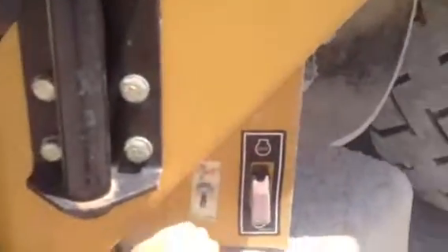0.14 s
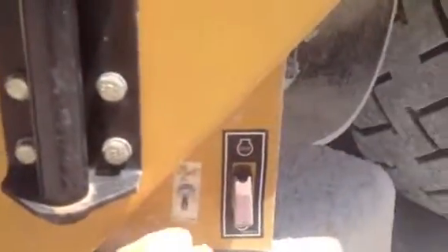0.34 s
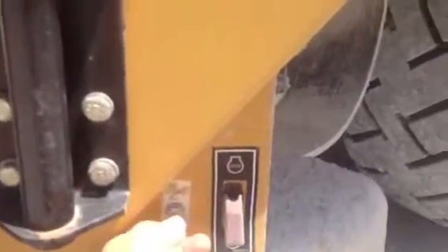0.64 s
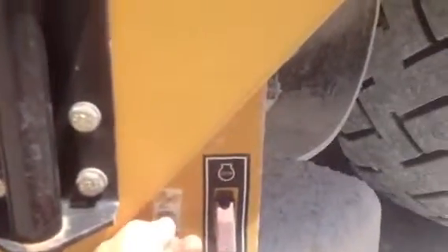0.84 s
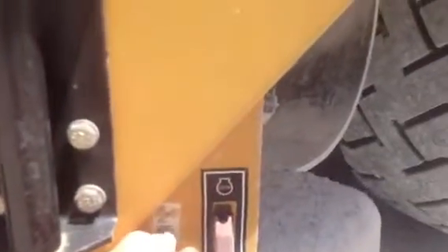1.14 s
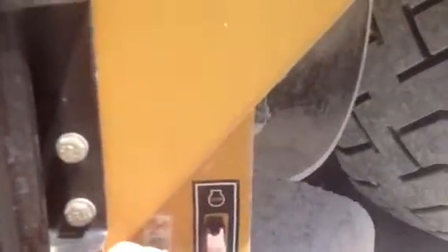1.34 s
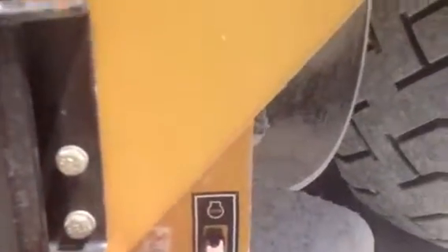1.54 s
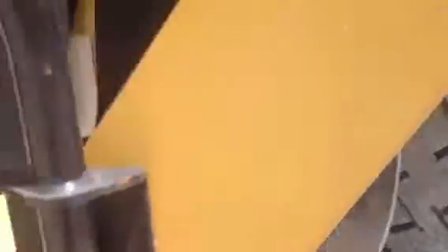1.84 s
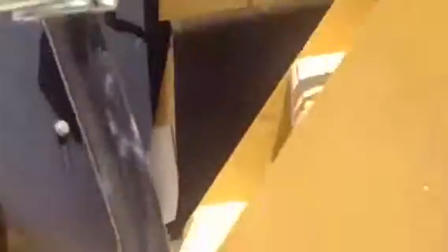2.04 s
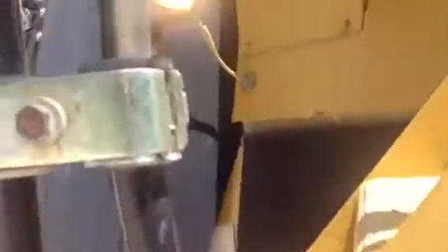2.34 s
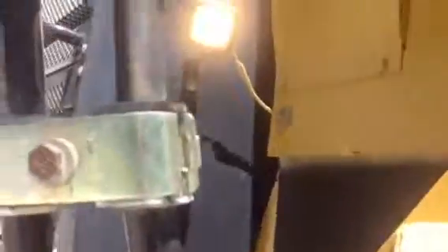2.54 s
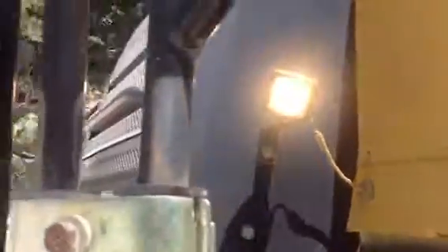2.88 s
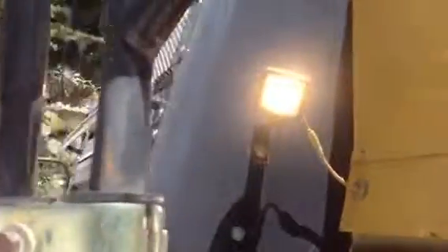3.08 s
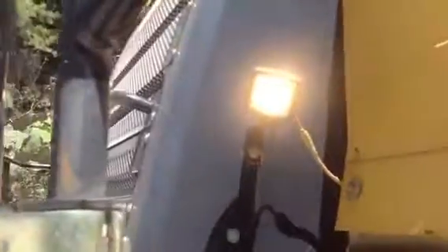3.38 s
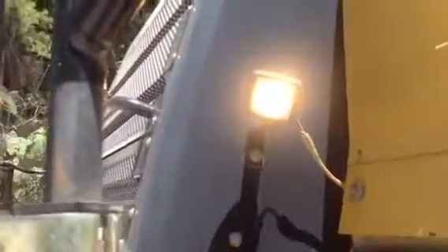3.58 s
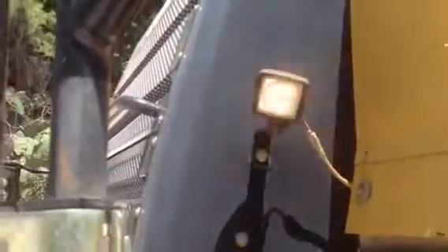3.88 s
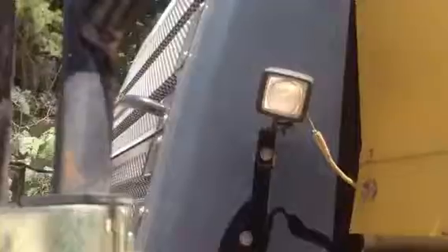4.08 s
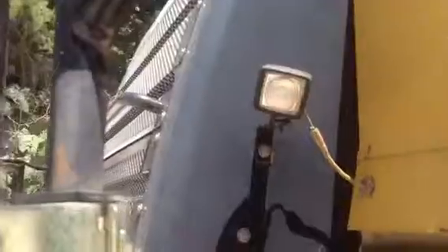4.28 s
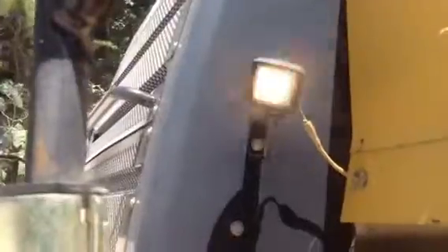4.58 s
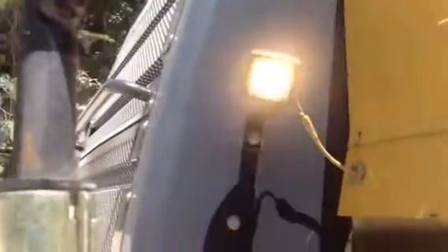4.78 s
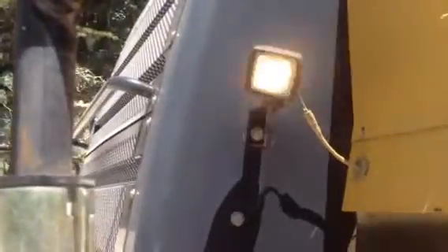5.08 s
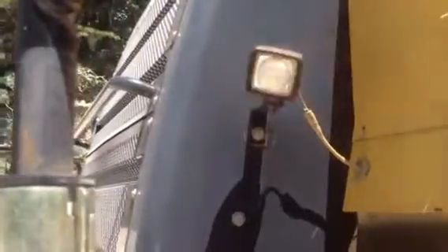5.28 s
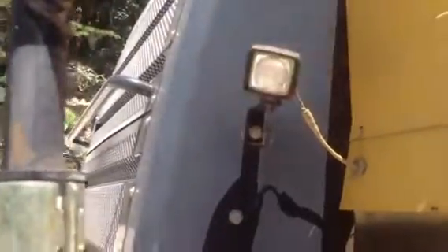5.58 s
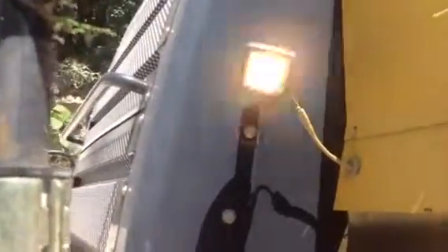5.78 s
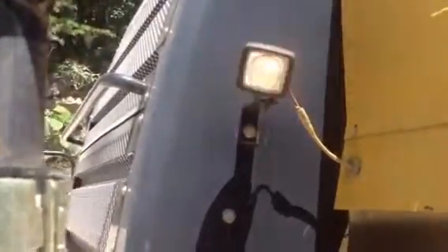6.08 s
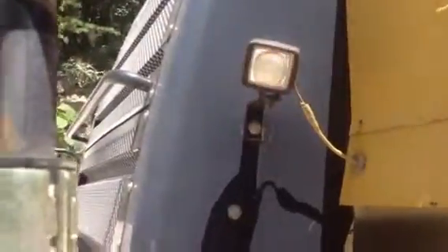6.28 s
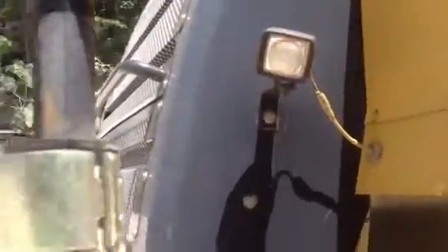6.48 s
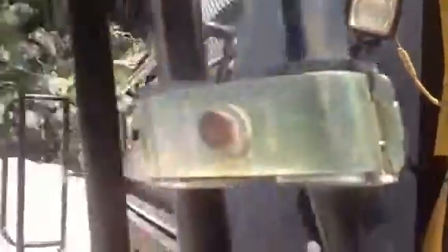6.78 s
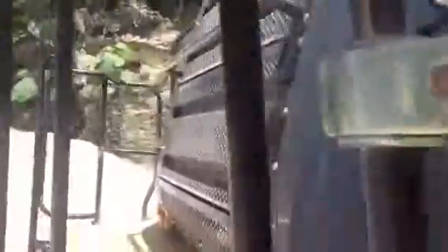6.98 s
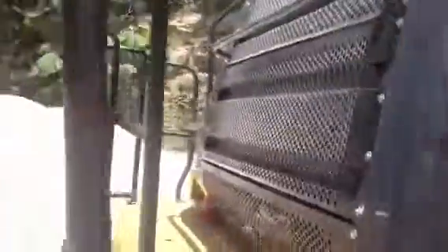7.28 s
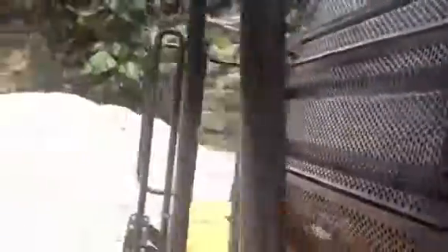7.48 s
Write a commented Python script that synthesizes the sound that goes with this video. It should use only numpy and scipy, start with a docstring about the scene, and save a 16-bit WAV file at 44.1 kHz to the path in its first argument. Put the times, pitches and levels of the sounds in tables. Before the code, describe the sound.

Outdoors on a parked, silent heavy truck, a cicada throbs rapidly from the trees. A switch snaps once against a steel panel with a short ring. The cicada swells, soft shoe scuffs and low thuds follow, then a relay clacks five times, irregularly spaced, sharp and tinny. The cicada dies away midway, leaving a faint forest hush. Grit ticks and a low footfall end it. Close handheld mono microphone, slight air buffeting.

```python
"""Relay clacks and a cicada on a steel deck

On the steel deck of a parked quarry truck, engine off, a switch snaps once and a relay then clacks five times
as a work lamp goes off and on: short cracks excite decaying modes of the sheet steel. A cicada in the trees
throbs, swells and dies away, its paired strokes being shaped noise. Slipping shoes scuff, damped low notes
thud, and bursts of filtered noise give grit ticks and rubbing. Uneven low noise is air buffeting the
hand-held mono microphone, over a steady forest hush."""
import sys
import numpy as np
from scipy import signal
from scipy.fft import rfft, irfft
from scipy.io import wavfile
from scipy.ndimage import uniform_filter1d, map_coordinates

SR = 44100
rng = np.random.default_rng(int(sys.argv[2]) if len(sys.argv) > 2 else 0)


def store_pcm(level_fs):
    """Save levels as 16-bit WAV."""
    pcm = np.round(np.clip(level_fs, -1, 1) * 32767).astype(np.int16)
    wavfile.write(sys.argv[1], SR, np.atleast_2d(pcm).T)


N = 336483
T = np.arange(N) / SR  # time, s

# switch snap, and relay clacks: start_s, level_db, extra_crack_db, body_db, clang_db, treble_db
SWITCH_SNAPS = [(1.4642, -30, -7, -1, -1.3, -4)]
RELAY_CLACKS = [(3.8705, -29.5, 11, 1, -2.5, 1.9), (4.609, -28, -4, -1.6, -0.3, -3.5),
                (5.1188, -29.5, 4, 0.2, 1.5, 2.5), (5.7305, -30, -10, -1.1, -1, -0.5),
                (6.036, -28.5, 1, -0.73, -1, -0.5)]
# frequencies at which a blow's colour is set: body, middle (always 0 dB), clang, treble: frequency_hz
BLOW_COLOUR_HZ = [890, 1790, 3720, 6100]
# lone modes of the switch panel, and of the relay box: frequency_hz, level_db, t60_s
PANEL_MODES = [(762, -14, 0.69), (828, -20, 0.54), (903, -17, 0.29), (1026, -16, 0.59), (1103, 12, 0.034),
               (1483, -7.5, 0.36), (1536, -7, 0.43), (1630, -21, 0.21), (1795, -12, 0.74), (2020, -9, 0.26),
               (2180, 9, 0.11), (2520, -10, 0.38), (2553, -22, .38), (2540, -15, 0.19), (3090, -4, .15),
               (3390, -15, 0.79), (3400, -17, 0.41), (4205, -15, 0.16)]
BOX_MODES = [(812, -10, .35), (843, -4, .26), (912, -12, .35), (997, -11, .45), (1042, -8, .55),
             (1104, -9, .48), (1272, -12, .4), (1406, -7, .32), (1460, -9, .42), (1521, -7, .33),
             (1747, -3, .27), (1798, -6, .42), (1884, -4, .3), (2021, -7, .25), (2129, -4, .34),
             (2362, -7, .32), (3250, -13, .32), (3860, -2, .25), (4040, 0, .25), (4312, -6, .16),
             (4390, -5, .14), (4646, -2, .18), (5235, -5, .2), (6040, -1, .15), (6137, -1, .16),
             (6947, -1, .16), (7243, -1, .14), (7567, -2, .15), (8098, -2, .15), (8322, -3, .14)]
# the steel's crowded modes: frequency_hz, level_db, t60_s
CROWDED_MODES = [(150, -20, 0.62), (338, -22, 0.24), (480, -12.5, 0.39), (654, -11.5, 0.1), (778, 1, 0.21),
                 (1120, -8.5, 0.28), (2010, -1.5, 0.28), (3020, -5.5, 0.26), (4200, 1, 0.17),
                 (5500, -5, 0.16), (7600, 3.5, 0.17), (9700, -5.5, 0.16), (13300, -7, 0.11),
                 (15500, -17, .11)]

# loudness of the cicada: time_s, level_db
SONG_LEVEL = [(0, -55.5), (.55, -51.5), (2.2, -49.5), (2.55, -47.5), (3.15, -45), (4.55, -48), (5.1, -59.5),
              (5.5, -80)]
# pace of the cicada, which rises with its effort: time_s, throbs_per_s
SONG_PACE = [(0, 13.987), (2.6, 15.701), (2.9, 15.421), (4.45, 15.901), (5.2, 13.747)]
# spectra of its bright and dark sounds: frequency_hz, level_db
BRIGHT_SPECTRUM = [(1500, -65), (2500, -46), (3100, -16), (3500, -7.5), (4200, -6), (4650, -6), (4900, -4),
                   (5300, -7), (6500, 2), (7200, -3.5), (8100, -1.5), (8600, -11), (9200, -22),
                   (10500, -30)]
DARK_SPECTRUM = [(1200, -55), (1900, -31), (2500, -15), (3050, -4.5), (3500, -2), (4200, -4.5), (5500, -5),
                 (7500, -14), (9000, -28), (11000, -55)]
FIRST_THROB_S = .0702
# a throb is an in-stroke and a return stroke, each an attack, a hold and a release
IN_ATTACK_S, IN_HOLD_S, IN_T60_S = 0.0014, 0.0067, 0.13
IN_CLICK_DB, IN_CLICK_T60_S = -8, .03  # the timbal's first buckle stands out
RETURN_AFTER_S, RETURN_ATTACK_S, RETURN_HOLD_S, RETURN_T60_S = 0.019, 0.0048, 0.021, 0.071
# levels at rest, then their change at full effort: dark return, bright return, buzz between strokes
RETURN_DB, RETURN_EFFORT_DB = -3.5, -7.5
RETURN_BRIGHT_DB, RETURN_BRIGHT_EFFORT_DB = -4.5, -1
BUZZ_DB, BUZZ_EFFORT_DB = -5, -9
RETURN_FLAT = .06  # share by which the dark return sounds lower at rest

# shoes scuffing: peak_s, level_db, rise_s, fall_s
SHOE_SCUFFS = [(2.63, -54, .15, .16), (2.93, -59.5, 0.16, .2), (3.11, -44, 0.079, 0.066),
               (6.43, -59, 0.18, 0.18), (6.72, -54.5, 0.11, .07), (6.9, -55.5, 0.16, 0.18),
               (7.44, -61.5, 0.11, 0.17), (7.62, -59, 0.3, .1)]
# spectrum of scuffs and rubbing: frequency_hz, level_db
SCUFF_SPECTRUM = [(60, -28.5), (150, -12), (300, 3), (600, 2.5), (1000, -2.5), (1700, -2.5), (2400, -9.5),
                  (3500, -17), (9000, -44), (15000, -38)]
# soft footfalls and bumps: start_s, level_db, pitch_hz, t60_s
FOOT_THUDS = [(1.466, -48.5, 233, 0.21), (1.685, -50.5, 131, 0.11), (2.004, -52.5, 130, .16),
              (2.094, -46, 129, 0.11), (2.913, -52, 152, 0.29), (3.215, -44.5, 147, 0.11),
              (3.322, -45, 121, 0.19), (3.42, -46.5, 185, 0.095), (3.459, -50, 134, 0.13),
              (3.688, -51, 138, 0.1), (4.025, -46, 129, 0.094), (7.149, -46.5, 165, 0.12),
              (7.383, -32.5, 144, 0.05), (7.429, -41.5, 196, 0.073), (7.452, -44, 171, 0.086)]
# grit and hand ticks: start_s, level_db, centre_hz, width_octaves, t60_s
GRIT_TICKS = [(.477, -56.5, 885, 1.2, 0.024), (1.225, -62, 1100, 1.9, 0.11),
              (2.971, -49.5, 1610, 0.72, 0.089), (3.046, -47.5, 676, 0.58, 0.045),
              (3.083, -48, 1320, 1.6, 0.28), (3.104, -45, 745, 1.9, 0.024), (3.117, -42, 1400, 1.5, 0.022),
              (3.076, -50, 12000, .8, .012), (6.414, -48.5, 1900, 0.47, 0.043),
              (6.425, -43, 670, 0.44, 0.031), (6.468, -57, 2000, 2, .04), (6.612, -51.5, 4000, 2.4, 0.035),
              (6.692, -49.5, 1600, 3.2, 0.034), (6.754, -47, 1500, 0.82, 0.016),
              (6.833, -56, 1690, 1.6, .02), (6.849, -41, 1590, 1.2, 0.01),
              (6.8824, -38.5, 1800, 1.84, 0.027), (7.434, -52.5, 1480, 2.9, 0.073),
              (7.567, -55, 3020, 2.4, 0.1), (7.582, -52, 3600, 0.29, 0.16)]
# a hand sliding along the steel: peak_s, level_db, rise_s, fall_s
HAND_SLIDES = [(7.05, -68, 0.22, 0.49)]
# a sleeve's fine swishes: peak_s, level_db, rise_s, fall_s
SLEEVE_SWISHES = [(1.32, -66, .35, .9), (1.88, -63, 0.36, 0.17), (2.65, -65, 0.35, 0.25),
                  (3.1, -62, 0.14, 0.22)]
SWELL_RANGE_DB = 20  # climb during rise_s, and drop during fall_s

# air on the microphone: time_s, level_db
AIR_LEVEL = [(0, -68), (1.4, -69.5), (1.55, -61.5), (2.3, -66), (3.3, -65), (4.7, -71), (7.63, -65.5)]
# spectrum of that air: frequency_hz, level_db
AIR_SPECTRUM = [(25, -41), (50, -16.5), (80, -9.5), (120, -4.5), (170, 0.5), (240, -5.5), (400, -13.5),
                (800, -35)]
# spectrum of the forest hush with far insects: frequency_hz, level_db
FOREST_SPECTRUM = [(100, -26), (250, 2), (500, 1.5), (1000, -1.5), (2000, -5), (3000, -2), (4800, 1.5),
                   (5800, 1.5), (6900, 6.5), (8000, 2), (9200, -8.5), (11000, -8.5), (15500, -11)]
TOP_HZ = 15500  # upper limit of the recorder


def undb(db):
    """Amplitude gain is ten to the power of decibels over twenty."""
    return 10 ** (np.asarray(db) / 20)


def unit(x):
    """Normalisation: scale to an rms of 1."""
    return x / np.sqrt(np.mean(x ** 2))


def curve(rows):
    """Linear interpolation in time of a two-column table."""
    time_s, value = np.transpose(rows)
    return np.interp(T, time_s, value)


def colour(x, points):
    """Spectral shaping: weight the Fourier components by a curve in dB over log frequency; rms 1."""
    hz, db = np.transpose(points)
    f = np.maximum(np.arange(len(x) // 2 + 1) * SR / len(x), 1)
    gain = undb(np.interp(np.log(f), np.log(hz), db))
    return unit(irfft(rfft(x) * gain, len(x)))


def band(x, lo_hz, hi_hz, order=2):
    """Causal band-pass filtering."""
    edges = [lo_hz, min(hi_hz, SR / 2 - 1000)]
    return signal.sosfilt(signal.butter(order, edges, "band", fs=SR, output="sos"), x)


def walk(rate):
    """Smoothed random steps, `rate` per second: a wander of rms near 1."""
    k = max(int(SR / rate), 2)
    steps = np.repeat(rng.standard_normal(N // k + 1), k)
    return unit(uniform_filter1d(steps, k))[:N]


def grainy(rate, spread_db):
    """Amplitude modulation: noise whose level wanders in dB."""
    return rng.standard_normal(N) * undb(spread_db * walk(rate))


def add(out, s, x):
    """Superposition: mix x into out from time s."""
    i = int(s * SR)
    out[i:i + len(x)] += x[:N - i]


def fade(t, t60):
    """Exponential free decay, 60 dB in t60."""
    return np.exp(-np.log(1000) * t / t60)


def stroke(t, attack_s, hold_s, t60):
    """Envelope of a driven then freely decaying source: attack, hold and release from t = 0."""
    return np.clip(t / attack_s, 0, 1) * fade(np.maximum(t - attack_s - hold_s, 0), t60)


def swells(rows):
    """Envelope of rubs, each climbing and falling evenly in dB; overlapping powers add."""
    power = 0
    for peak_s, level_db, rise_s, fall_s in rows:
        distance = np.maximum((peak_s - T) / rise_s, (T - peak_s) / fall_s)
        power = power + undb(level_db - SWELL_RANGE_DB * distance) ** 2
    return power ** .5


def clacks(events, modes, ring_db, sheet_db, crack_db, tail_db):
    """Impact excitation: a contact's crack sets off lone and crowded modes, with a faint outdoor echo."""
    out, t = np.zeros(N), np.arange(SR) / SR
    hz, db, t60 = np.transpose(modes)
    centres, shared_sheet = sheet_bands(t, hz)
    for s, level_db, extra_crack_db, body_db, clang_db, treble_db in events:
        blow_colour = [body_db, 0, clang_db, treble_db]
        mode_tint = np.interp(np.log(hz), np.log(BLOW_COLOUR_HZ), blow_colour)
        sheet_tint = np.interp(np.log(centres), np.log(BLOW_COLOUR_HZ), blow_colour)
        phase = rng.uniform(0, 2 * np.pi, (len(hz), 1))
        # each blow lands a little differently
        size = undb(db + mode_tint + 2 * rng.standard_normal(len(hz)))
        ring = size @ (np.sin(2 * np.pi * hz[:, None] * t + phase) * fade(t, t60[:, None]))
        # part of the crowded ring is common to all blows, part is new each time
        sheet = undb(sheet_tint) @ (.5 * shared_sheet + 0.64 * sheet_bands(t, hz)[1])
        sheet *= chatter(len(t))
        crack = unit(band(rng.standard_normal(SR), 3200, 6000)) * fade(t, .01)
        tail = unit(band(rng.standard_normal(SR), 530, 1900)) * fade(t, 0.87)
        blow = undb(ring_db) * ring * (1 - fade(t, 0.021))  # the lone modes build up gradually
        blow += undb(sheet_db) * sheet
        blow += undb(crack_db + extra_crack_db) * crack
        blow += undb(tail_db) * tail
        add(out, s, undb(level_db) * blow * (1 - fade(t, 0.0016)))
    return out


def sheet_bands(t, mode_hz, cluster_hz=45, cluster_db=9):
    """Statistical modal density: third-octave noise, denser round the lone modes, decays band by band."""
    hz, db, t60 = np.transpose(CROWDED_MODES)
    centres = 160 * 2 ** (np.arange(20) / 3)
    edge = 2 ** (1 / 6)
    gains = undb(np.interp(np.log(centres), np.log(hz), db)) * np.sqrt(centres)
    gains /= np.linalg.norm(gains)
    decays = np.interp(np.log(centres), np.log(hz), t60)
    f = np.arange(len(t) // 2 + 1) * SR / len(t)
    # clusters are cluster_hz wide at 2 kHz and widen with the root of frequency
    width = cluster_hz * np.sqrt(mode_hz[:, None] / 2000)
    near = np.exp(-((f - mode_hz[:, None]) / width) ** 2).max(axis=0)
    noise = irfft(rfft(rng.standard_normal(len(t))) * undb(cluster_db * near), len(t))
    slices = np.array([unit(band(noise, mid / edge, mid * edge, order=4)) for mid in centres])
    return centres, slices * gains[:, None] * fade(t, decays[:, None])


def chatter(size):
    """Contact chatter as amplitude modulation: a quick flicker of the level."""
    return undb(1.4 * walk(rate=450)[:size])


def cicada():
    """Timbal buckling: bright in-stroke, darker return; effort quickens it and bares the first burst."""
    pace = curve(SONG_PACE)
    effort = (pace - pace.min()) / np.ptp(pace)
    throbs = np.cumsum(pace) / SR
    # seconds since the current throb began
    age = (throbs - np.interp(FIRST_THROB_S, T, throbs)) % 1 / pace
    pull = stroke(age, IN_ATTACK_S, IN_HOLD_S, IN_T60_S)
    pull += undb(IN_CLICK_DB) * stroke(age, IN_ATTACK_S, 0, IN_CLICK_T60_S)
    back = stroke(age - RETURN_AFTER_S, RETURN_ATTACK_S, RETURN_HOLD_S, RETURN_T60_S)
    bright_back = back * undb(RETURN_BRIGHT_DB + RETURN_BRIGHT_EFFORT_DB * effort)
    buzz = undb(BUZZ_DB + BUZZ_EFFORT_DB * effort)
    bright_level = np.sqrt(pull ** 2 + bright_back ** 2 + buzz ** 2)
    high = bright_level * colour(grainy(rate=890, spread_db=-1.0), BRIGHT_SPECTRUM)
    dark = colour(grainy(rate=520, spread_db=0.0), DARK_SPECTRUM)
    # reading the noise more slowly lowers its pitch
    dark = map_coordinates(dark, [np.cumsum(1 - RETURN_FLAT * (1 - effort))], mode="mirror")
    low = back * dark * undb(RETURN_DB + RETURN_EFFORT_DB * effort)
    song = (high + low) * undb(curve(SONG_LEVEL))
    # echoes off the truck's panels comb the song
    echoes = np.zeros(N)
    for lag_s in rng.uniform(.001, .009, 6):
        echoes += np.roll(song, int(lag_s * SR))
    return song + 0.24 * echoes


def scuffs(slips_per_s=280, slip_spread_db=5.0, slip_t60=0.014, rub_db=-8):
    """Stick-slip friction: soles and sleeves drag in small uneven slips over a soft rub."""
    slip_db = slip_spread_db * np.minimum(rng.exponential(size=N), 3)
    slips = (rng.random(N) < slips_per_s / SR) * undb(slip_db)
    crackle = unit(signal.fftconvolve(slips, fade(T[:SR // 20], slip_t60))[:N])
    friction = (crackle + undb(rub_db)) * rng.standard_normal(N)
    return swells(SHOE_SCUFFS) * colour(friction, SCUFF_SPECTRUM)


def thuds():
    """Damped oscillation: weight shifts give a soft push, a low note and a dull rattle."""
    out, t = np.zeros(N), np.arange(SR // 2) / SR
    for s, db, hz, t60 in FOOT_THUDS:
        note = np.sin(2 * np.pi * hz * t)
        rattle = unit(band(rng.standard_normal(len(t)), hz / 1.7, hz * 1.36))
        push = 1 - fade(t, 0.043)
        add(out, s, undb(db) * (note + 0.71 * rattle) * fade(t, t60) * push)
    return band(out, 60, 340)


def ticks():
    """Heavily damped impacts: grit under a shoe and fingers on the housing give short noise bursts."""
    out, t = np.zeros(N), np.arange(SR // 4) / SR
    for s, db, hz, octaves, t60 in GRIT_TICKS:
        edge = 2 ** (octaves / 2)
        click = unit(band(rng.standard_normal(len(t)), hz / edge, hz * edge))
        add(out, s, undb(db) * click * fade(t, t60))
    return out


def slides(count=16):
    """Friction-driven resonance: a hand's rubbing noise feeds the lower modes of the steel box."""
    hz, db, t60 = np.transpose(BOX_MODES[:count])
    t = T[:SR // 2]
    response = undb(db) @ (np.sin(2 * np.pi * hz[:, None] * t) * fade(t, t60[:, None]))
    rub = rng.standard_normal(N)
    ring = unit(signal.fftconvolve(rub, response)[:N])
    return swells(HAND_SLIDES) * (ring + undb(4.5) * colour(rub, SCUFF_SPECTRUM))


def swish():
    """Fine friction: cloth sliding near the microphone gives grainy high-band noise."""
    return swells(SLEEVE_SWISHES) * unit(band(grainy(rate=170, spread_db=1.0), 8200, 13700))


def outdoors():
    """Turbulence and diffuse sound: uneven low air noise over the even hush of the forest."""
    air = colour(grainy(rate=27, spread_db=3.0), AIR_SPECTRUM) * undb(curve(AIR_LEVEL))
    forest = colour(rng.standard_normal(N), FOREST_SPECTRUM) * undb(-62.5)
    return air + forest


def scene():
    """Linear superposition of all sources at one microphone, given to two equal channels."""
    switch = clacks(SWITCH_SNAPS, PANEL_MODES, ring_db=-7.5, sheet_db=7, crack_db=-2, tail_db=-24.0)
    relay = clacks(RELAY_CLACKS, BOX_MODES, ring_db=-13, sheet_db=2.5, crack_db=-1, tail_db=-28.5)
    handling = scuffs() + thuds() + ticks() + slides() + swish()
    mono = switch + relay + cicada() + handling + outdoors()
    return np.array([mono, mono])


def record(dry):
    """Band limiting and soft saturation: thin the deep bass, round the highest peaks, cut the top."""
    thin = signal.sosfilt(signal.butter(2, 60, "high", fs=SR, output="sos"), dry)
    rounded = .22 * np.tanh(thin / .22)
    return signal.sosfilt(signal.ellip(10, .2, 70, TOP_HZ, fs=SR, output="sos"), rounded)


dry = scene()
out = record(dry)
store_pcm(out)
```